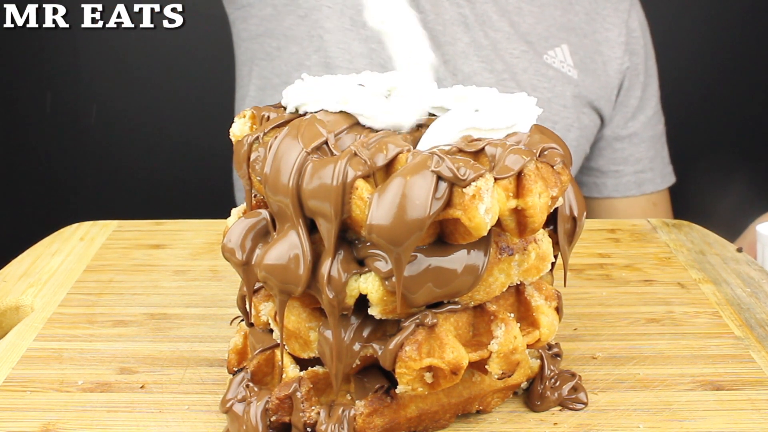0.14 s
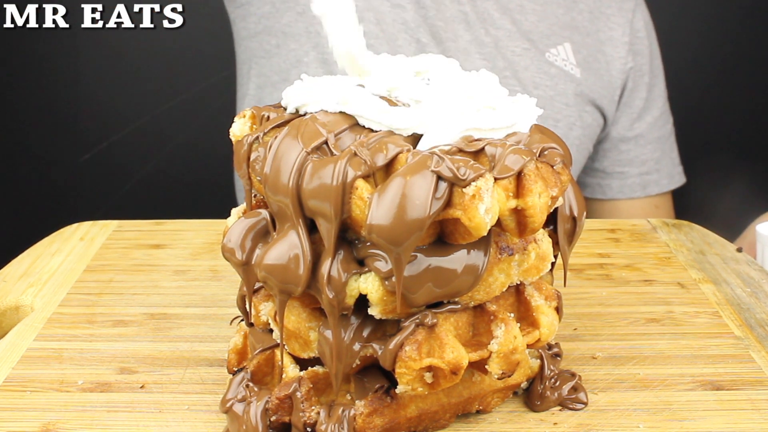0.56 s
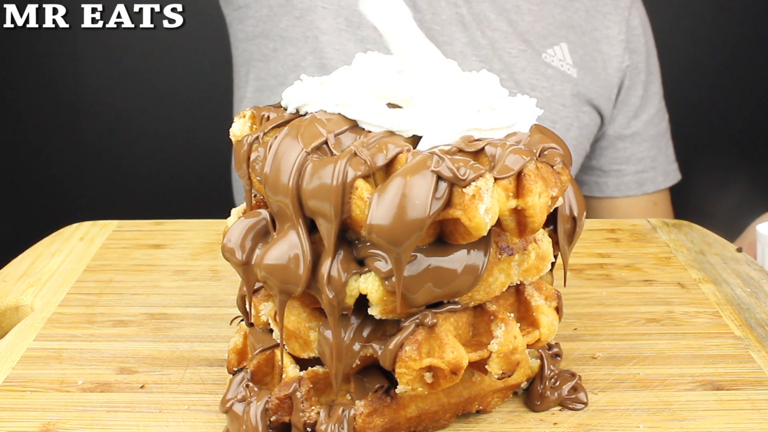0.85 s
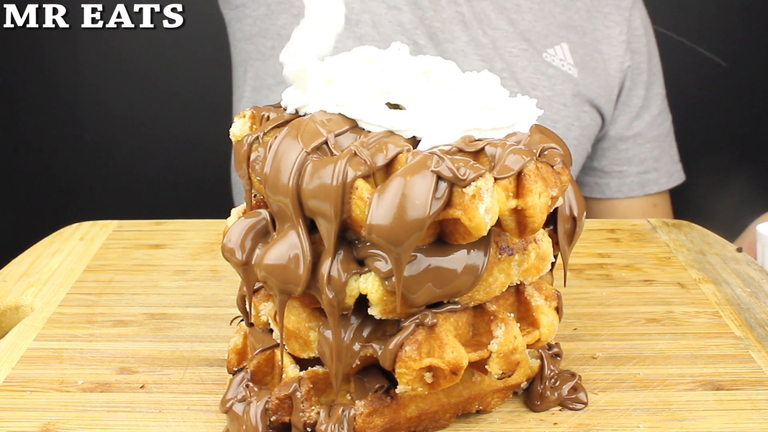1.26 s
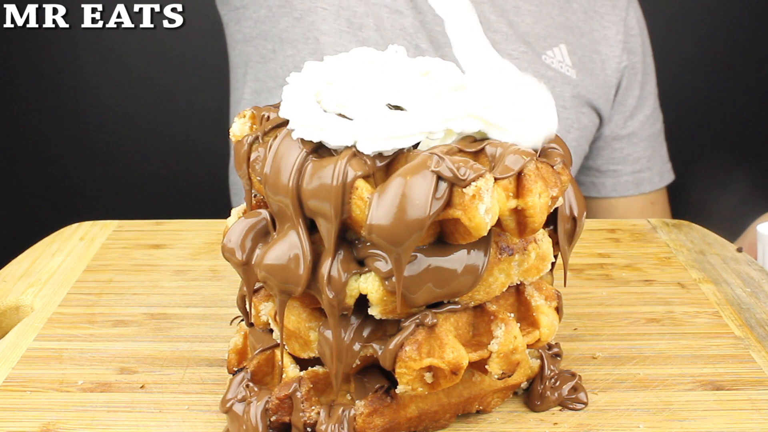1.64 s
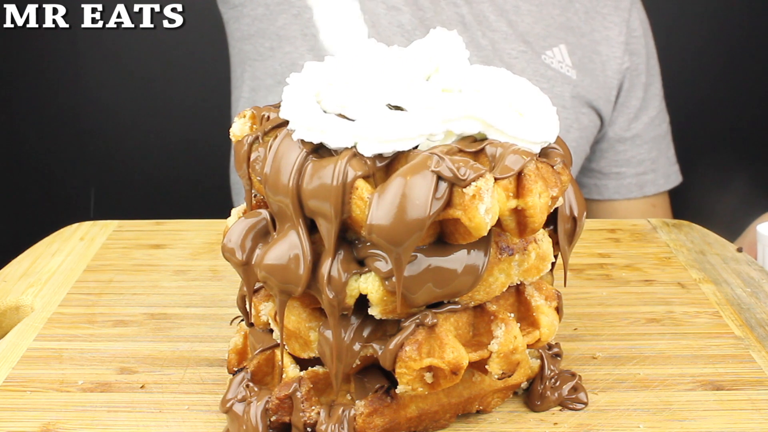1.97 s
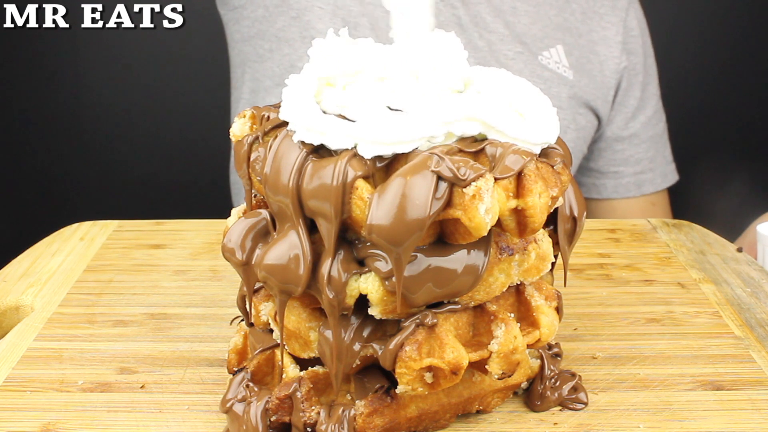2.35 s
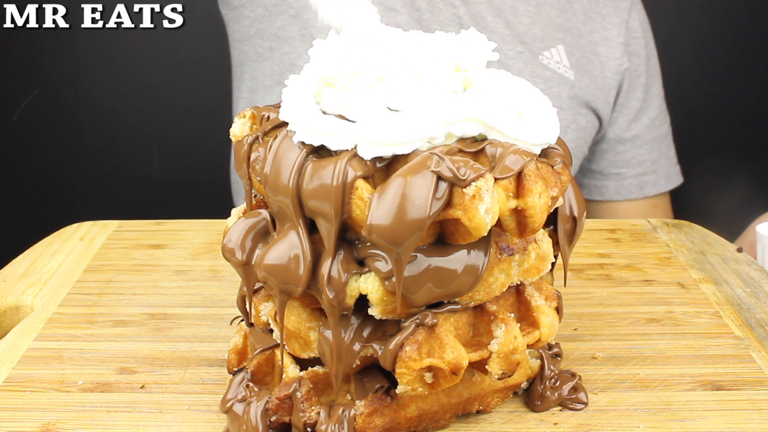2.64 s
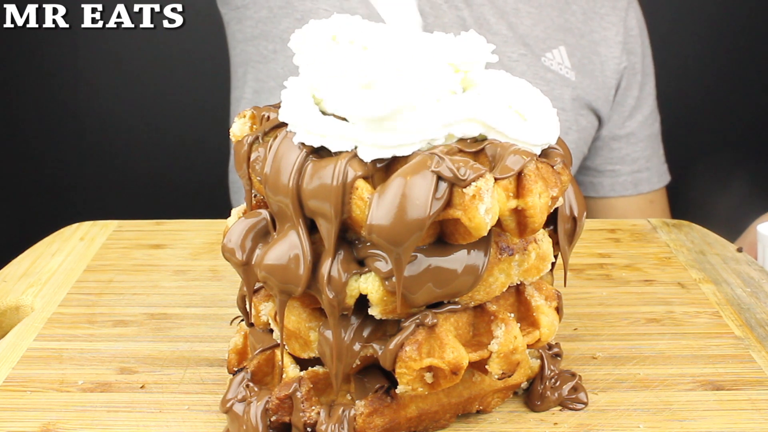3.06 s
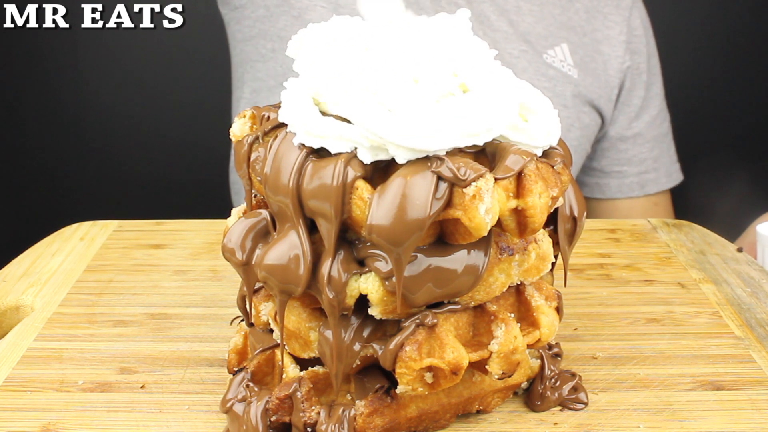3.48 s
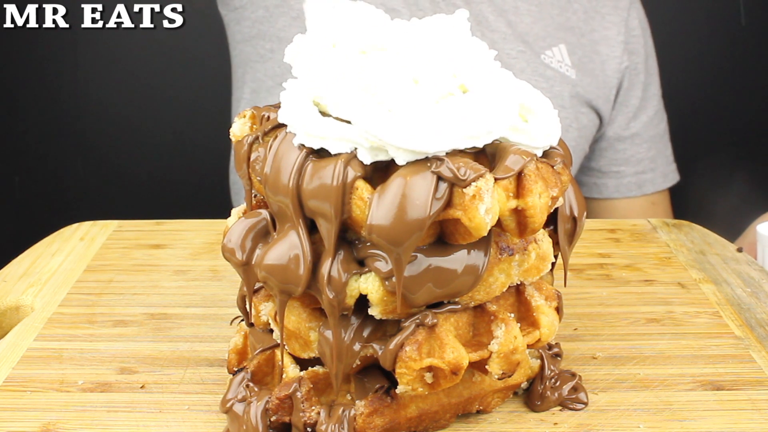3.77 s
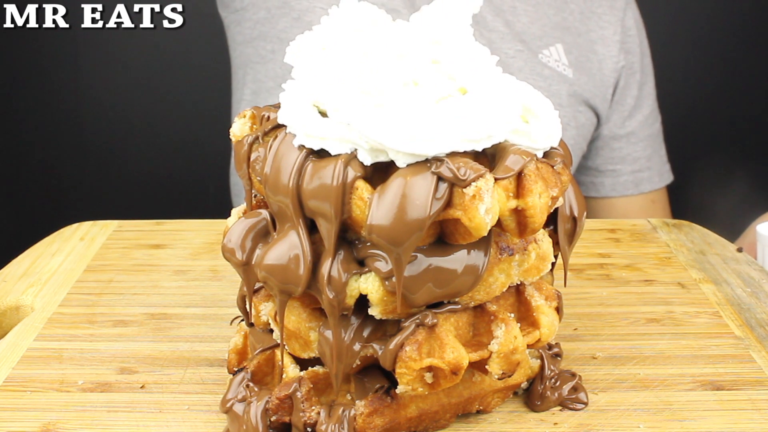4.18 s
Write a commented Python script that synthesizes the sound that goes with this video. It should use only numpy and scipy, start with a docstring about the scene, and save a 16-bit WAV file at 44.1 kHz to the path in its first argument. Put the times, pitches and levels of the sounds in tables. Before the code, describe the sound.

A can of whipped cream hisses in one long squirt, the foam sputtering, crackling and popping close to the microphone in a small room.

```python
"""A can of whipped cream is squirted in circles onto a stack of waffles, close to one microphone.
Gas hisses through the nozzle as noise in three bands; foam sputters as dense random clicks, coloured
into crackle and gurgle; larger bubbles pop as short damped swings, one with an echo. Resonances slide as
the hand circles, the small room and the table stamp fixed peaks and dips on the low end, and a faint
room tone lies below."""
import sys
import numpy as np
from scipy import signal
from scipy.fft import irfft
from scipy.io import wavfile
from scipy.ndimage import uniform_filter1d

SR = 44100
rng = np.random.default_rng(int(sys.argv[2]) if len(sys.argv) > 2 else 0)


def wrap_up_sound(samples):
    """Save the sound to the file named by the first command line argument, as 16-bit audio."""
    columns = np.atleast_2d(samples).T
    # keep every value between -1 and 1, then stretch to whole-number steps
    tamed = np.clip(columns, -1, 1)
    steps = np.round(tamed * 32767).astype(np.int16)
    wavfile.write(sys.argv[1], SR, steps)


N = 190379


def gain_of(db):
    """Amplitude factor of a level in dB."""
    return 10 ** (np.asarray(db) / 20)


def evened(x):
    """Scales x to an RMS of 1."""
    return x / np.sqrt(np.mean(x ** 2) + 1e-20)


def read(points, hz):
    """Spectrum in dB, linear over log frequency between the points."""
    f, value = np.transpose(points)
    return np.interp(np.log(hz + 1), np.log(f + 1), value)


def bumps(table, hz):
    """Bell-shaped peaks and dips, summed in dB."""
    return sum(db * np.exp(-.5 * ((hz - f) / width) ** 2) for f, width, db in table)


def causal(db):
    """Complex gain with the minimum phase of a ringing body, along axis 0."""
    log_gain = np.log(gain_of(np.maximum(db, -100)))
    full_circle = np.concatenate([log_gain, log_gain[-2:0:-1]])
    phase = signal.hilbert(full_circle, axis=0).imag[:len(log_gain)]
    return np.exp(log_gain - 1j * phase)


def coloured(x, shape):
    """Filters x by a fixed colour, shape(hz) in dB."""
    hz = np.fft.rfftfreq(8192, 1 / SR)
    impulse = irfft(causal(shape(hz)))[:4096]
    return signal.oaconvolve(x, impulse)[:N]


def flicker(hz):
    """Random wobble up to hz: low-passed noise at an RMS of 1."""
    lowpass = signal.butter(2, hz, fs=SR, output="sos")
    return evened(signal.sosfilt(lowpass, rng.standard_normal(N)))


# Pressure on the nozzle. Each row: time in seconds, hiss level in dB, lift of the 4 kHz hump in dB,
# crackle level in dB, rush level in dB.
FLOW = [(0.0, -28, 1, -31.5, -31.5), (0.14, -29, 3, -35.5, -34), (0.28, -26.5, -0.5, -35, -32),
        (0.45, -26.5, -0.7, -33.5, -30.5), (0.7, -27, 3.5, -33, -33.5), (0.9, -27, -2.5, -35, -31.5),
        (1.15, -26, 1, -34.5, -31.5), (1.35, -26, 0.5, -36, -31), (1.62, -26, 3, -35.5, -34.5),
        (1.68, -23, 1.5, -32.5, -30.5), (1.85, -24, 5, -32.5, -34), (2.1, -25, 2.5, -35, -30.5),
        (2.24, -27, 0, -35.5, -31), (2.42, -26, -1.5, -32, -30.5), (2.66, -27, 6, -34.5, -35),
        (2.8, -28, -0.7, -39, -30.5), (2.94, -28, 1.5, -36, -32), (3.02, -29.5, 1.5, -40, -35),
        (3.36, -29, -2, -38, -31.5), (3.64, -29, -3, -39.5, -31), (3.78, -30, 3.5, -38.5, -35),
        (4.06, -31, -2, -40, -32), (4.2, -29, 2, -39.5, -35), (4.31, -30, 3, -36.5, -38)]


def flow(t, column):
    """One column of the nozzle pressure, linear between its rows."""
    rows = np.array(FLOW)
    return np.interp(t, rows[:, 0], rows[:, column])


def gas(spectrum, level_db, fast_db, slow_db):
    """Turbulence: noise whose strength flutters as foam and gas pockets pass the tip."""
    flutter = gain_of(fast_db * flicker(hz=250) + slow_db * flicker(hz=23.0))
    noise = rng.standard_normal(N) * flutter
    return gain_of(level_db) * evened(coloured(noise, lambda hz: read(spectrum, hz)))


# Spectra of the high hiss, the mid hiss and the rush. Each row: frequency in Hz, relative level in dB.
HISS = [(5000, -40), (7000, -22), (8300, -12), (10000, -10), (13500, -10), (15700, -22)]
MID = [(3000, -36.5), (4800, -4), (6500, -3), (8200, -4), (10000, -31)]
RUSH = [(900, -33.5), (2000, -10), (2500, -3.5), (3200, -5.5), (4300, -6), (5200, -13.5), (8000, -45)]
MID_DB, MID_FADE_DB_PER_S = -6, -0.92  # against the hiss; it thins as the heap grows


def jet(t):
    """Escaping gas: three bands of turbulent noise driven by the nozzle pressure."""
    hiss_db = flow(t, column=1)
    mid_db = hiss_db + MID_DB + MID_FADE_DB_PER_S * t
    hiss = gas(HISS, hiss_db, fast_db=0.5, slow_db=0.5)
    mid = gas(MID, mid_db, fast_db=1.7, slow_db=0.2)
    rush = gas(RUSH, flow(t, column=4), fast_db=1.0, slow_db=0.4)
    return hiss + mid + rush


def bubbles(per_s, spread_db):
    """Foam bubbles tear at the tip: dense clicks of either sign, in clumps, a few of them large."""
    rate_per_s = per_s * gain_of(1.5 * flicker(hz=25.27))
    size = gain_of(spread_db * np.minimum(rng.exponential(1, N), 3.5))
    sign = rng.choice([-1., 1.], N)
    return size * sign * (rng.random(N) < rate_per_s / SR)


# Gas pockets break through the foam. Each row: peak time in seconds, crackle lift in dB, gurgle lift in dB.
BURSTS = [(0.02, -2.5, 1), (0.19, 3.5, 4), (0.26, 5, 12), (0.48, 3, 4), (0.79, 2, 8), (1.035, 5, 8),
          (1.14, 2, -1), (1.23, -2, -0.5), (1.56, 4.5, -2), (2.19, 8, 2), (2.31, 2, 3.5), (2.79, -3, 5.5),
          (3.05, 8.5, 2.5), (3.09, 3, 7), (3.37, -2, -3), (3.58, 4, 4), (3.728, 6, 10.5), (3.768, 4, 12),
          (3.925, 6, 2), (4.044, -2, 9), (4.123, 1, 6.5), (4.14, 0, 6.5), (4.245, -5, 2)]
BURST_RISE_S, BURST_FALL_S = 0.0073, 0.018


def bursts(t, column):
    """Quick rise, slower exponential fall, summed in dB."""
    total_db = np.zeros(len(t))
    for row in BURSTS:
        since = t - row[0]
        decay = np.where(since < 0, (since / BURST_RISE_S) ** 2, abs(since) / BURST_FALL_S)
        total_db += row[column] * np.exp(-decay)
    return total_db


# Spectra of the crackle and the gurgle. Each row: frequency in Hz, relative level in dB.
SPUTTER = [(500, -41), (900, -19.5), (1500, -5.5), (2300, -7.5), (4000, -21), (7000, -26.5), (15000, -58)]
GURGLE = [(30, -41), (140, -26), (200, -11), (400, -0.5), (700, -1), (1000, -5.5), (2000, -46)]
GURGLE_DB, GURGLE_DB_PER_S = -10, 0.59  # against the crackle; it grows with the heap
OWN_GURGLE = 0.59  # amplitude weight of bubbles deeper in the heap


def sputter(t):
    """The same clicks give the crackle and, with deeper bubbles in the heap of cream, a low gurgle."""
    clicks = bubbles(per_s=1500, spread_db=4.5)
    deeper = bubbles(per_s=800, spread_db=4.5)
    mixed = (1 - OWN_GURGLE) * clicks + OWN_GURGLE * deeper
    crackle = evened(coloured(clicks, lambda hz: read(SPUTTER, hz)))
    gurgle = evened(coloured(mixed, lambda hz: read(GURGLE, hz)))
    level_db = flow(t, column=3)
    crackle_db = level_db + bursts(t, column=1)
    gurgle_db = level_db + GURGLE_DB + GURGLE_DB_PER_S * t + 1.0 * flicker(hz=5.8) + bursts(t, column=2)
    return gain_of(crackle_db) * crackle + gain_of(gurgle_db) * gurgle


# Larger bubbles bursting, one (3.732) followed by its echo about 6 ms later.
# Each row: time in seconds, strength in dB before the nozzle, pitch in Hz.
POPS = [(0.027, -26, 2590), (0.212, -21.5, 1910), (0.227, -17, 1530), (0.33, -14.5, 2240),
        (0.716, -11.5, 2570), (0.886, -16, 2550), (1.034, -23, 2550), (1.093, -17.5, 2970),
        (1.179, -25, 2610), (1.286, -25, 2460), (1.804, -17, 1550), (2.067, -17, 2670), (2.145, -17, 1560),
        (2.391, -19.5, 2660), (2.405, -15, 2570), (2.435, -24, 2960), (2.519, -11.5, 3030),
        (2.652, -17, 2730), (2.781, -12, 2640), (3.088, -18.5, 3310), (3.436, -18, 2950),
        (3.486, -16.5, 2690), (3.582, -22, 2610), (3.732, -14.5, 3500), (3.738, -15, 2670),
        (3.764, -19, 1800), (3.778, -14.5, 2580), (3.962, -30, 2660), (4.121, -20, 1590),
        (4.138, -15, 2490), (4.245, -14, 1950)]


def pops():
    """Each pop or echo is about one swing of pressure, with no net push of air."""
    out, t = np.zeros(N), np.arange(-40, 200) / SR
    for start_s, db, hz in POPS:
        cycles = t * hz
        fade = np.exp(-np.where(cycles < 0, 5.3 * cycles ** 2, 0.92 * cycles))
        swing = np.cos(2 * np.pi * cycles)
        balanced = swing - np.average(swing, weights=fade)
        at = round(start_s * SR)
        out[at:at + len(t)] += gain_of(db) * fade * balanced
    return out


# Ends of each swing of the circling hand. Each row: time in seconds, slide of the treble resonances in %,
# slide of the low resonances in %.
TURNS = [(-0.1, 0.3, 0.8), (0.25, -2.3, -0.9), (0.6, 2.0, 2.3), (0.9, -1.1, -0.7), (1.2, 1.8, 1.4),
         (1.63, -2.9, -1.8), (2.0, 2.3, 2.3), (2.4, -0.3, -0.5), (2.7, 2.5, 2.2), (3.17, -3.1, -4.3),
         (3.66, 2.8, 2.2), (4.08, -1.0, -1.8), (4.45, 2.0, 1.8)]


def circling(t, column=1):
    """Smooth swings between the turning points, in percent."""
    rows = np.transpose(TURNS)
    count = np.arange(len(TURNS))
    place = np.interp(t, rows[0], count)
    eased = place // 1 + .5 - .5 * np.cos(np.pi * (place % 1))
    return np.interp(eased, count, rows[column])


def patches(shape, bins, frames):
    """Random hills over frequency and time, at an RMS of 1."""
    field = rng.standard_normal(shape[::-1]).T
    over_hz = uniform_filter1d(field, size=bins, axis=0)
    return evened(uniform_filter1d(over_hz, size=frames, axis=1))


# Resonances of nozzle and stream, and dips between them. Each row: centre at rest in Hz,
# bell half width in Hz, gain in dB.
NOZZLE = [(2230, 64, 1.5), (2366, 61, -6.5), (2606, 95, 4.5), (2802, 38, -6), (2927, 53, 4.5),
          (3050, 33, -3), (3163, 57, -4.5), (3660, 136, 3), (3670, 400, 2), (5010, 164, -4.5),
          (6500, 89, 1.5), (6750, 104, -6.5), (7130, 200, 2), (7970, 390, -5), (9000, 310, 4.5),
          (9920, 260, -3), (11234, 390, 9), (11850, 170, -2.5), (12890, 450, 4.5), (13800, 200, -3),
          (15160, 500, -8)]
LOW_LEAD_S = .1  # low resonances swing earlier
# The 8 kHz dip deepens as the resonances sink; a narrow band near 12 kHz follows the swing too, mostly a small
# peak that sinks to a slight dip at the lowest points.
DIP_DB, DIP_DB_PER_PERCENT, DIP_LAG_S, DIP_DB_PER_S = 2, -1.4, 0.13, .6
UPPER_DIP_SHARE, UPPER_DIP_DB = 0.67, -2


def nozzle(x, patchy_db, ripple_db):
    """Resonances slide as the can circles; wide patches and the fine ripple of wall echoes drift at random."""
    hz, t, z = signal.stft(x, SR, nperseg=2048, noverlap=1536)
    treble = np.clip(hz[:, None] / 4000 - 1, 0, 1)  # 0 up to 4 kHz, 1 from 8 kHz
    percent = treble * circling(t) + (1 - treble) * circling(t + LOW_LEAD_S, column=2)
    at_rest_hz = hz[:, None] / (1 + percent / 100)
    swing_db = DIP_DB_PER_PERCENT * circling(t - DIP_LAG_S)
    dip_db = DIP_DB + DIP_DB_PER_S * t + swing_db
    upper_dip_db = UPPER_DIP_DB + UPPER_DIP_SHARE * swing_db
    changing = [(4020, 580, flow(t, column=2)), (8270, 520, -dip_db), (12050, 86, -upper_dip_db)]
    colour_db = bumps(NOZZLE + changing, at_rest_hz)
    # patches 300 Hz by 0.17 s, ripple 45 Hz by 0.4 s
    colour_db += patchy_db * patches(z.shape, round(300 / hz[1]), round(0.17 / t[1]))
    colour_db += ripple_db * patches(z.shape, round(45 / hz[1]), round(.4 / t[1]))
    return signal.istft(z * causal(colour_db), SR, nperseg=2048, noverlap=1536)[1][:N]


# Standing waves and cancellations of room and table. Each row: centre in Hz, bell half width in Hz, gain in dB.
ROOM = [(195, 11, 5), (300, 19, -5), (401, 12, 2.5), (553, 8.7, 2.5), (639, 3.8, 9), (682, 24, -8.5),
        (763, 11, -10), (823, 21, 2), (909, 70, -5), (1095, 46, 6), (1170, 12, -9.5), (1254, 22, 7),
        (1327, 30, -7), (1370, 36, 1.5), (1472, 6.2, -17.5), (1650, 30, 2.5), (1648, 16, -5.5),
        (2080, 20, -7)]


def room(x):
    """Room and table boost or cancel fixed frequencies."""
    return coloured(x, lambda hz: bumps(ROOM, hz))


# Spectrum of the room tone. Each row: frequency in Hz, relative level in dB.
HUM = [(12, -44), (20, -28), (65, -8), (123, -16), (160, 1), (210, -24), (350, -120)]
HUM_DB = -73.5  # before the rumble filter


def room_tone():
    """Steady low noise."""
    noise = rng.standard_normal(N)
    return gain_of(HUM_DB) * evened(coloured(noise, lambda hz: read(HUM, hz)))


def scene():
    """Jet, sputter and pops pass the nozzle and the room; room tone is added."""
    t = np.arange(N) / SR
    source = nozzle(jet(t) + sputter(t) + pops(), patchy_db=0.97, ripple_db=1.82)
    return np.tile(room(source) + room_tone(), (2, 1))


EDGE_HZ = 15720


def record(dry):
    """One microphone on both channels, its rumble filter, then the band limit."""
    rumble_filter = signal.butter(2, 45, "high", fs=SR, output="sos")
    thinned = signal.sosfilt(rumble_filter, dry)
    band_limit = signal.firwin(1023, EDGE_HZ, window=("kaiser", 10), fs=SR)
    return signal.oaconvolve(thinned, band_limit[None], "same")


dry = scene()
out = record(dry)
wrap_up_sound(out)
```